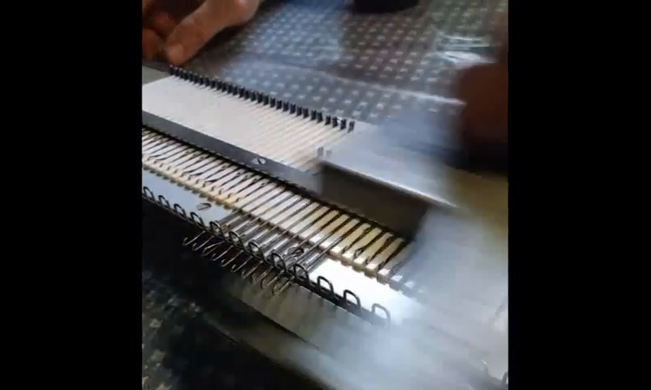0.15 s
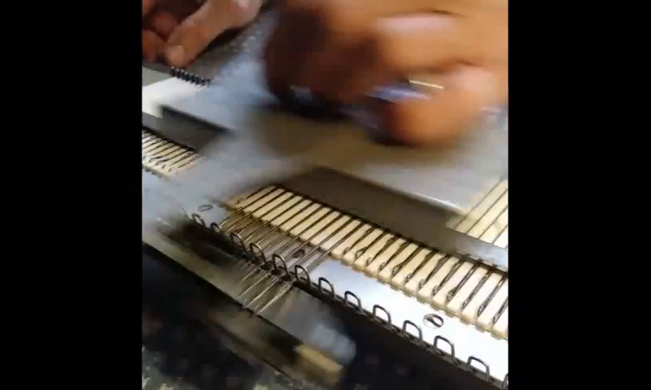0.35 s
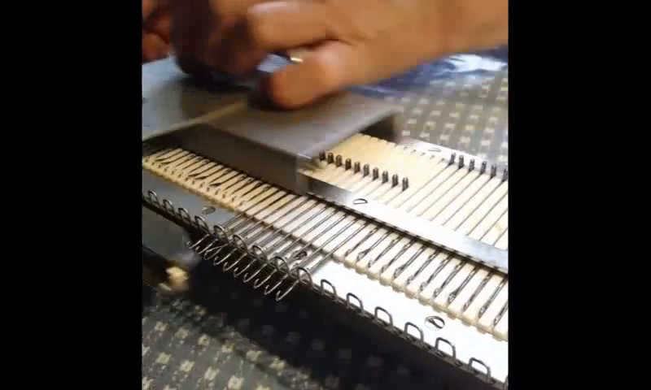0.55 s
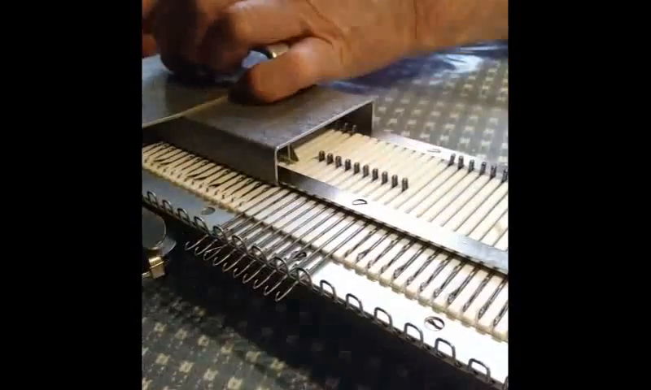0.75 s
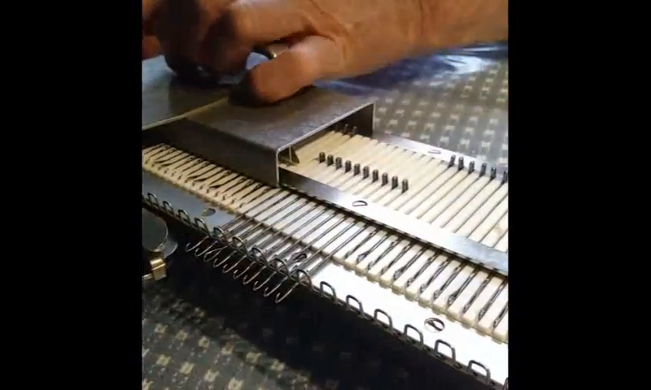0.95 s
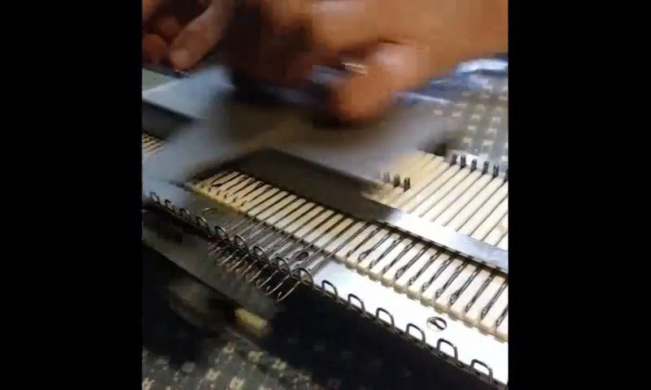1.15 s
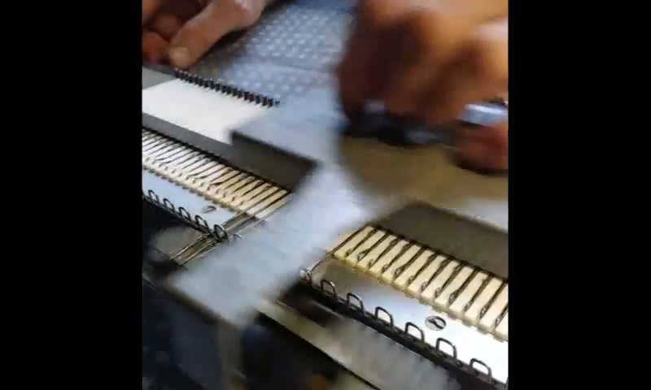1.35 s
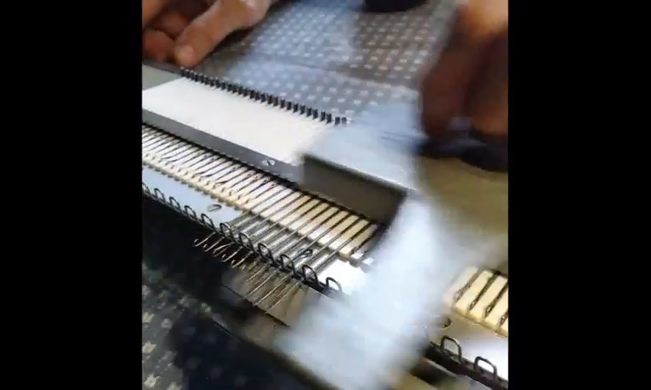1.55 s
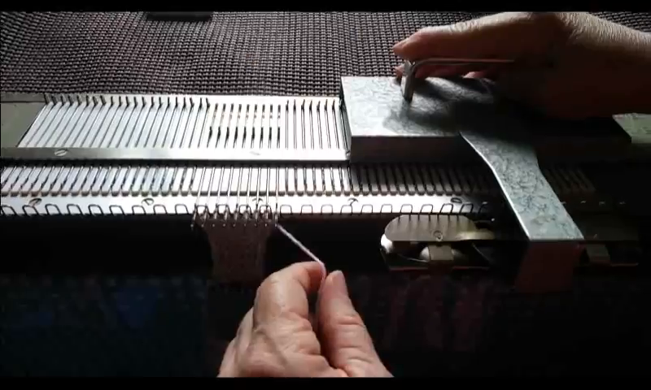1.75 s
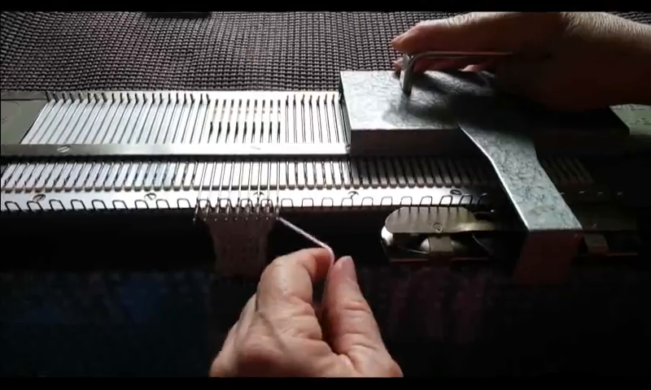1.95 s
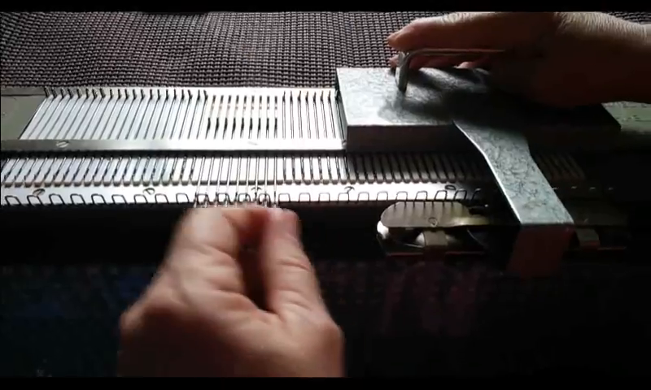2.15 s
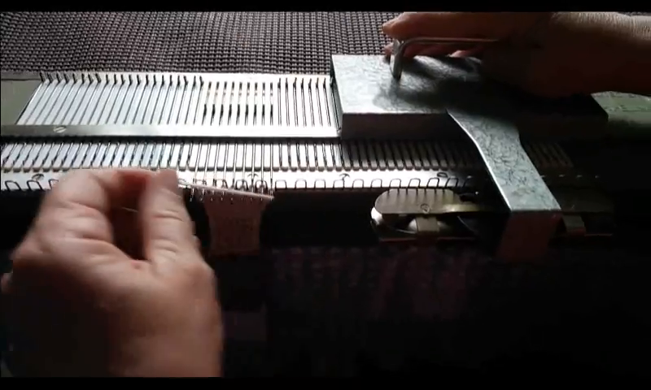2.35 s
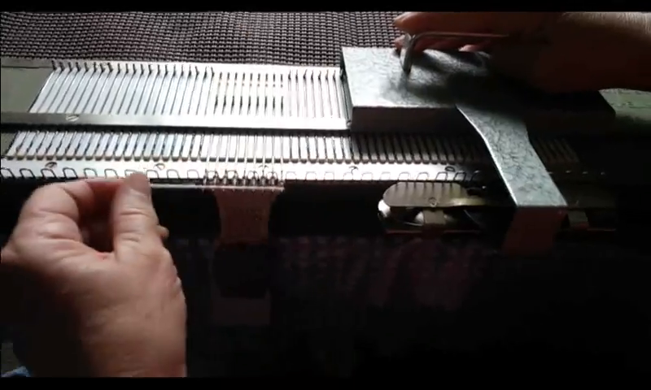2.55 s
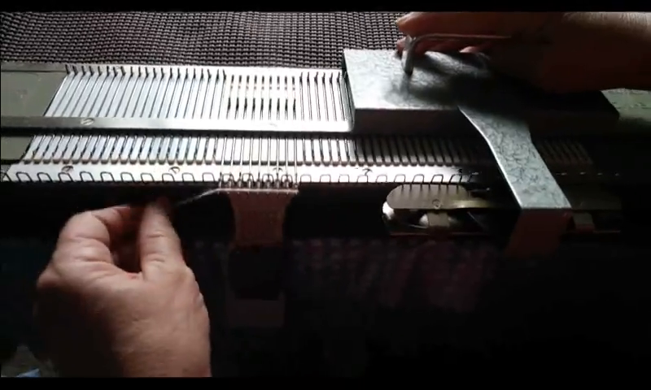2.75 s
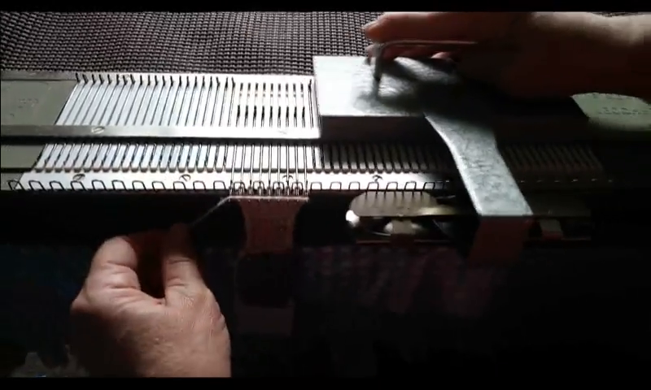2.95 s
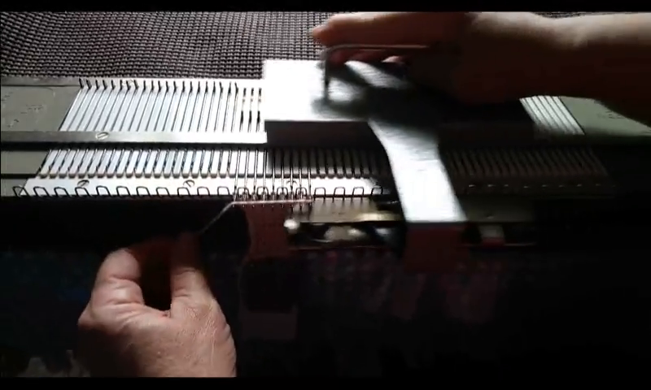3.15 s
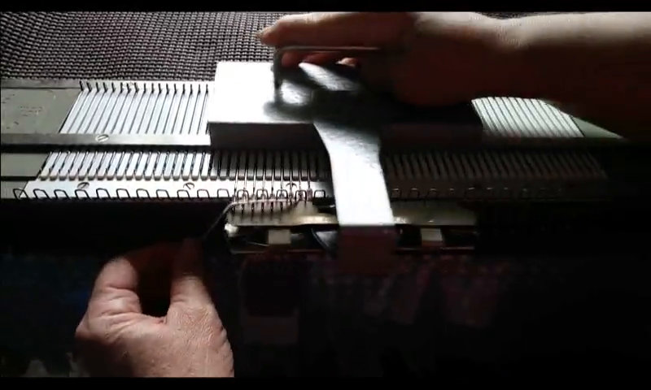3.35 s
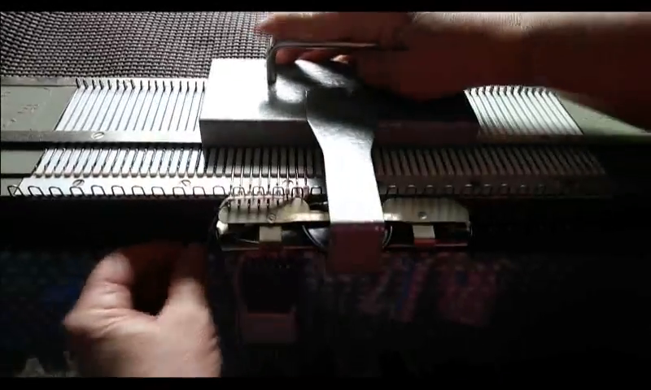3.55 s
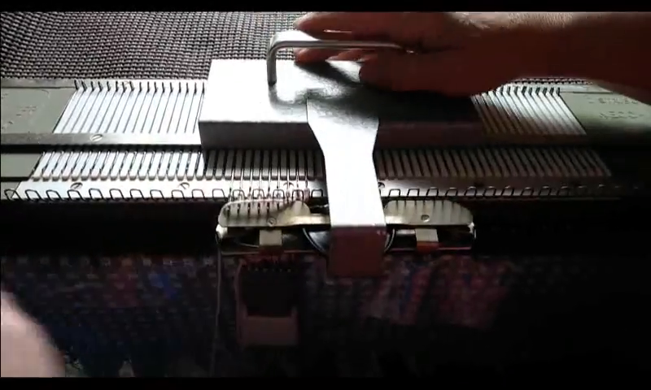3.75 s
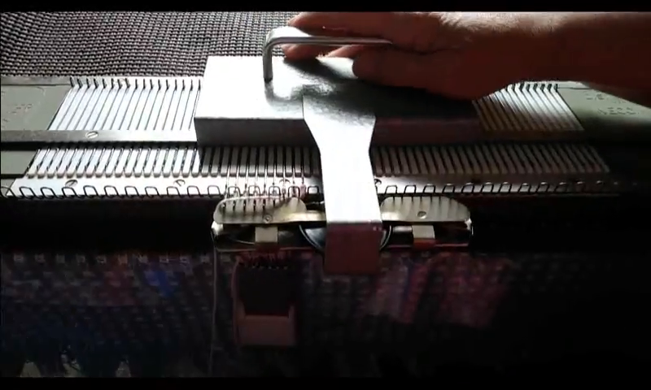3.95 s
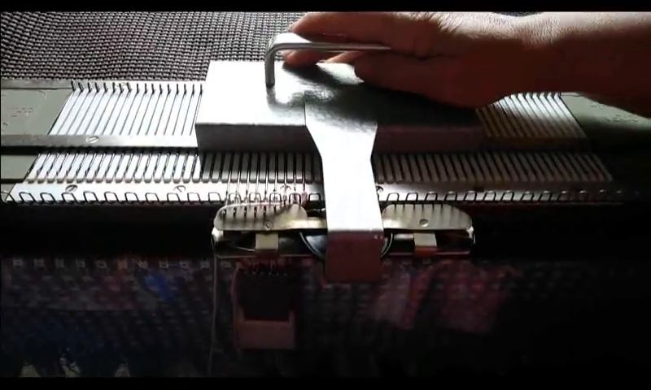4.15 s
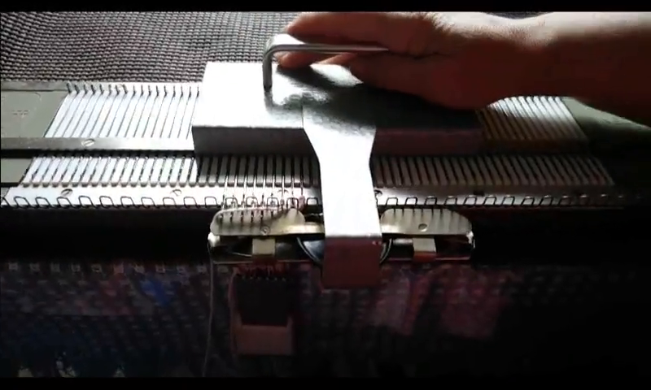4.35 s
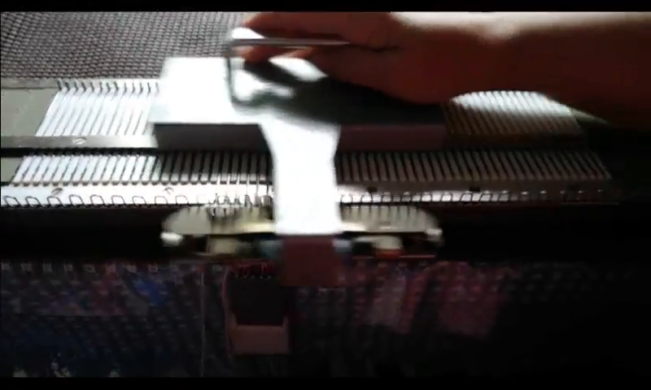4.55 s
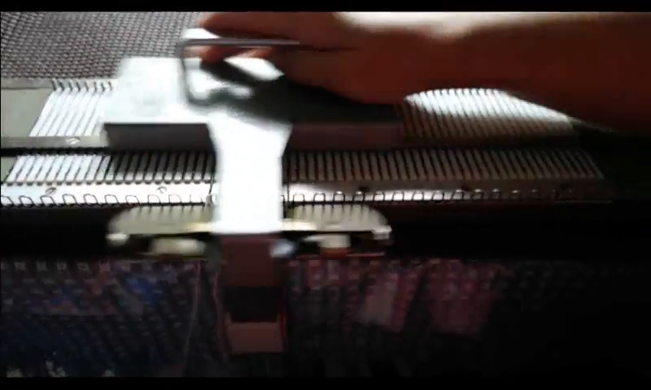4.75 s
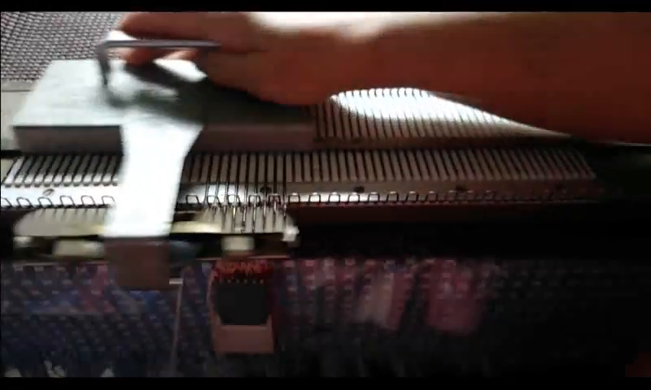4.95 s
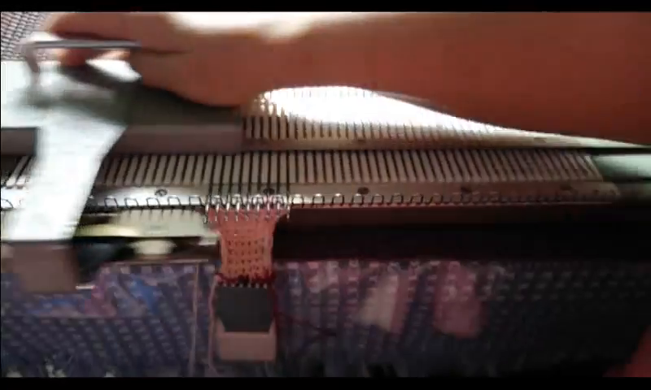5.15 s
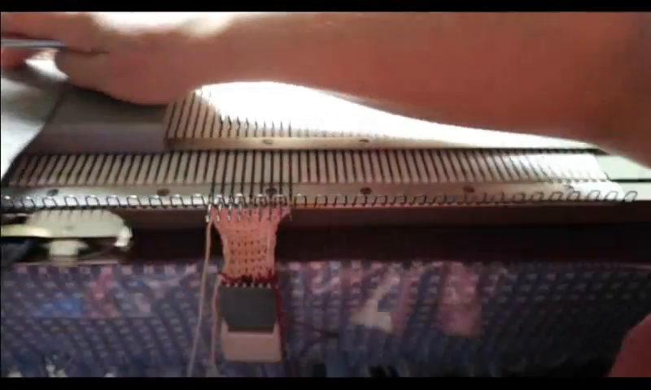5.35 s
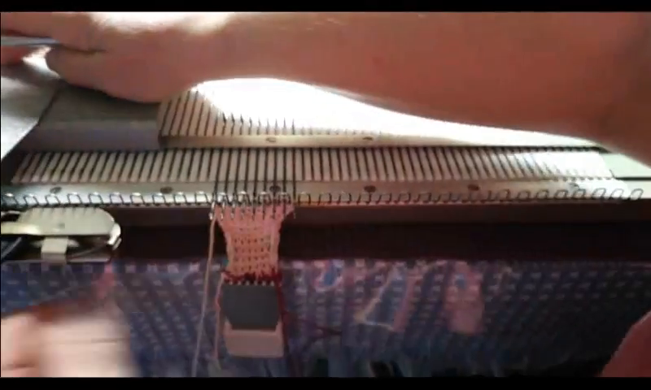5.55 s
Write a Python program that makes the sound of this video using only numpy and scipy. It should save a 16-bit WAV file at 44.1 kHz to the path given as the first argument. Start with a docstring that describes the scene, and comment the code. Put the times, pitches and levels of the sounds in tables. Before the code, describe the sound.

Metal scrapes and needles clatter as a knitting machine carriage slides twice quickly, then slowly, then firmly, in a small room.

```python
"""A bright steel scrape and a rattle of clacks: a knitting machine carriage is pushed by hand along its
needle bed in a small room. Two quick strokes sound close by; after a blink of silence come a slow stroke
and a firm one from the front. Needle butts clack against the cams, the carriage scrapes on its rails and
the bed rumbles. Sliding yarn and metal add thin whistles, and light taps and one dull knock ring the
table, all over a faint room tone."""
import sys
import numpy as np
from scipy import signal
from scipy.fft import rfft, irfft, next_fast_len
from scipy.io import wavfile
from scipy.ndimage import uniform_filter1d

SR = 44100
rng = np.random.default_rng(int(sys.argv[2]) if len(sys.argv) > 2 else 0)


def master_out(mix):
    """Clip the mix to full scale and print it as 16-bit PCM to the path in sys.argv[1]."""
    frames = np.transpose(np.atleast_2d(mix))
    ceiling = np.clip(frames, -1, 1)
    pcm = np.round(ceiling * 32767).astype(np.int16)
    wavfile.write(sys.argv[1], SR, pcm)


N = 246959
TIME = np.arange(N) / SR
FFT_SIZE = next_fast_len(N + SR, real=True) // 2 * 2
FREQ = np.maximum(np.arange(FFT_SIZE // 2 + 1) * SR / FFT_SIZE, 1)

# The swell of the room's low murmur. Each row: time in seconds, relative level in dB.
MURMUR_SWELL = [(1.85, -89), (2.13, -86), (2.6, -74), (4.14, -77), (4.35, -65), (5.1, -73), (5.6, -88)]
# Tone curves of the murmur and the hiss. Each row: frequency in Hz, relative level in dB.
MURMUR_COLOUR = [(18, -50.5), (30, -15), (54, -0.5), (118, -4.5), (150, -2.5), (262, -33), (300, -30),
                 (390, -56.5), (660, -120)]
HISS_COLOUR = [(120, -39.5), (200, -9), (311, -4.5), (334, -16.5), (401, -9), (683, -10.5), (12400, -18),
               (16000, -30.5)]
# The hand's gesture in each stroke; the push bites where the cams meet the needles.
# Each row: time in seconds, push in dB (it drives the scrape), relative bed rumble in dB.
FIRST_PUSH = [(0, -24, -34), (0.058, -38, -47.5), (0.07, -19.5, -36.5), (0.125, -17.5, -37.5),
              (0.32, -15, -36.5), (0.43, -27.5, -36.5), (0.58, -48.5, -48), (0.64, -78.5, -57.5),
              (0.8, -80.5, -77)]
SECOND_PUSH = [(0.9, -71, -79), (0.94, -47.5, -54), (0.975, -35.5, -40), (1.064, -33, -40.5),
               (1.076, -26, -40.5), (1.23, -17.5, -32.5), (1.43, -30, -42.5), (1.51, -17.5, -35),
               (1.62, -39, -46), (1.636, -26.5, -39), (1.73, -33.5, -42.5), (1.78, -49, -53.5)]
SLOW_PUSH = [(2.76, -64.5, -76.5), (2.815, -61.5, -87), (2.835, -45.5, -61), (3.04, -45.5, -69),
             (3.055, -37.5, -83), (3.18, -36.5, -91), (3.26, -31, -61.5), (3.42, -54, -68),
             (3.5, -74, -72.5)]
FIRM_PUSH = [(4.38, -63, -73), (4.422, -56, -63), (4.434, -35, -48), (4.52, -27.5, -44.5),
             (4.61, -42.5, -50.5), (4.7, -33.5, -41), (4.745, -23, -49), (5.05, -33.5, -46.5),
             (5.15, -32.5, -50), (5.32, -40.5, -65), (5.44, -57, -65), (5.6, -84, -78)]
# Tone curve of the metal in each stroke. Each row: frequency in Hz, relative level in dB.
FIRST_METAL = [(290, -44), (500, -14), (586, -21), (750, -11.5), (1360, -9), (2070, -17.5), (2390, -9.5),
               (3390, -10), (5240, -3), (7420, -12.5), (7980, -13), (8450, -14), (11300, -26.5),
               (15100, -23.5), (16000, -24)]
SECOND_METAL = [(290, -51), (500, -10), (659, -19.5), (740, -8.5), (1300, -7.5), (1440, -12.5), (1840, -14),
                (1980, -14.5), (3490, -12.5), (5310, -3.5), (7420, -13), (8090, -14.5), (10700, -25.5),
                (15100, -24.5), (16000, -15)]
SLOW_METAL = [(290, -59), (500, -66), (621, -28), (718, -14), (1510, -2), (1790, 0), (3250, -3),
              (3920, 1.5), (4340, -5.5), (5470, 0.5), (6330, -6), (9360, -9.5), (12000, -30.5),
              (14000, -12.5), (16000, -21.5)]
FIRM_METAL = [(290, -51.5), (500, -15), (843, -9), (974, -4.5), (1140, -5), (1570, -3), (1690, -3),
              (2010, -0.5), (3060, -2.5), (3490, 0), (3920, -3), (4940, -0.5), (11500, -23), (14500, -14),
              (16000, -18)]
# Tone curves of the bed and table. Each row: frequency in Hz, relative level in dB.
BED_CLOSE = [(18, -49.5), (30, -22), (91, -1), (134, -4), (302, -2), (356, -6.5), (481, -1), (560, -13),
             (800, -2.5), (1040, -34), (1760, -120)]
BED_FRONT = [(18, -32), (30, -22.5), (70, 12), (129, 1), (163, -2), (278, -13.5), (386, 0.5), (616, -14.5),
             (800, -2.5), (1040, -40), (1760, -120)]
# The ring of the carriage's steel. Each row: pitch in Hz, width in Hz, level against the tone curve in dB.
STEEL_CLOSE = [(1397, 90, -11.5), (1830, 53, -1.5), (3060, 130, 0.5), (3730, 40, -7), (4650, 97, -2.5),
               (5160, 350, -3), (5540, 74, -5), (5590, 120, 0.5), (6800, 260, -4), (7880, 240, 1.5)]
STEEL_FRONT = [(979, 170, -6), (1586, 24, -2.5), (1886, 52, -15.5), (2822, 34, -3), (3640, 210, -16),
               (4510, 15, -8), (4940, 100, -6), (5810, 79, -10), (6895, 120, -8), (7940, 100, -1)]
# Rattles as the cams cross evenly spaced needles.
# Each row: start and end in seconds, needles per second, strength above the push in dB.
NEEDLE_RUNS = [(0.069, 0.083, 90, 10), (0.109, 0.179, 100, 15.5), (0.191, 0.291, 92, 13),
               (0.303, 0.415, 71, 11), (1.069, 1.251, 72, 15.5), (1.477, 1.511, 62, 10),
               (1.633, 1.724, 66, 9), (2.796, 2.824, 33, 17.5), (3.208, 3.307, 31, 13.5),
               (4.463, 4.488, 41, 19), (4.511, 4.561, 41, 14.5), (4.764, 5.046, 43, 14)]
# A stiff needle snags and snaps free. Each row: time in seconds, strength in dB.
SNAGS = [(0.194, -2), (0.934, -24.5), (1.071, -7), (1.225, -8), (1.32, -6.5), (1.369, -9.5), (1.399, -12),
         (1.589, -15.5), (2.934, -30), (3.049, -33), (3.126, -23.5), (4.436, -18.5), (4.726, -4),
         (4.768, -4.5), (4.914, -15.5), (4.943, -20)]
# Lone resonances of sliding yarn and metal, from hollow scrapes to thin whistles.
# Each row: start and end in seconds, pitch in Hz, width in Hz, level in dB.
WHISTLES = [(0.207, 0.329, 1330, 280, -27), (0.36, 0.684, 5300, 200, -51), (0.5, 0.829, 500, 34, -53),
            (0.491, 0.809, 1750, 63, -55.5), (0.935, 1.119, 1000, 360, -37), (1.052, 1.31, 1480, 290, -27),
            (2.099, 2.56, 2210, 125, -58), (2.11, 2.383, 4250, 90, -77.5), (2.275, 2.46, 5850, 150, -77),
            (2.395, 2.5, 1340, 130, -75.5), (2.41, 2.66, 146, 18, -61.5), (2.468, 2.837, 2290, 86, -66.5),
            (2.72, 3.095, 3520, 140, -50), (3.353, 3.48, 490, 29, -56), (3.458, 3.618, 3670, 100, -60.5),
            (3.66, 3.914, 3650, 74, -68.5), (4.061, 4.155, 1185, 360, -57), (4.054, 4.17, 1753, 69, -62)]
# The carriage creeps and its rail sings.
# Each row: start and end in seconds, level in dB, brightness in dB per octave.
CREEPS = [(3.403, 3.602, -62.5, -6.5), (4.223, 4.658, -55.5, 0), (5.265, 5.694, -62, 4)]
# The rail's resonances, lowest first. Each row: pitch in Hz, width in Hz, relative level in dB.
RAIL_MODES = [(2200, 180, 1), (3165, 100, -9.5), (3710, 41, -19), (4470, 270, 0.5), (5100, 90, -18.5),
              (5630, 610, -3), (6820, 98, -10.5)]
# Low thuds and thin pings. Each row: start in seconds, level in dB, pitch in Hz, 60 dB decay in seconds.
THUDS = [(0.365, -20.5, 244, 0.069), (0.821, -46.5, 883, 0.036), (0.821, -56, 2530, 0.051),
         (1.098, -21, 300.7, 0.077), (2.83, -55.5, 231, 0.29), (4.999, -13, 2550, 0.015),
         (5.024, -15, 2590, 0.016), (5.048, -9, 2240, 0.0096)]
# Knocks and taps on machine and table. Each row: start in seconds, level in dB, low and high edge in Hz.
KNOCKS = [(0.822, -44, 48.4, 587), (0.933, -37, 197.2, 1492), (2.932, -47.5, 185, 1570),
          (3.511, -37, 1500, 4000), (3.673, -23, 111, 5620), (4.389, -40, 1470, 2300),
          (4.64, -25, 2440, 3300), (4.66, -38, 2130, 3400)]
# Tone curve of a knock. Each row: frequency in Hz, relative level in dB.
KNOCK_COLOUR = [(47, -26), (80, -2.5), (157, -3), (296, -10), (431, -7.5), (464, -16), (529, -11.5),
                (770, -18), (894, -14), (1930, -13), (3250, -28.5), (5090, -25.5), (7000, -44),
                (9100, -105), (15400, -120)]
# The ring of table and frame. Each row: pitch in Hz, level against the knock in dB, 60 dB decay in seconds.
TABLE_MODES = [(160, -17.5, 0.46), (298, -25, 0.028), (956, -15, 0.081), (1850, -19.5, 0.066)]


def from_db(db):
    """Decibels to gain."""
    return 10 ** (np.asarray(db) / 20)


def rms_one(x):
    """Scale to rms 1."""
    return x / np.sqrt(np.mean(np.abs(x) ** 2) + 1e-20)


def band(x, low_hz, high_hz, order=4):
    """Butterworth band-pass."""
    edges = [low_hz, min(high_hz, SR / 2 - 100)]
    return signal.sosfilt(signal.butter(order, edges, "band", fs=SR, output="sos"), x + 1e-18)


def body(colour, modes=()):
    """A resonant body of unit power: a broad tone curve with ringing peaks standing on it."""
    hz, db = np.transpose(colour)
    curve = from_db(np.interp(np.log(FREQ), np.log(hz), db))
    cepstrum = irfft(np.log(curve))
    broad = np.exp(2 * rfft(cepstrum[:FFT_SIZE // 2], FFT_SIZE))   # minimum phase: nothing sounds early
    peaks = sum(from_db(level) / (1 + 2j * (FREQ - pitch) / width) for pitch, width, level in modes)
    return rms_one(broad * (1 + peaks))


def through(x, response):
    """Play x through a frequency response."""
    return irfft(rfft(x, FFT_SIZE) * response)[:N]


def dying(start, t60):
    """Envelope that jumps to 1 and dies away."""
    return (TIME >= start) * from_db(-60 * np.clip((TIME - start) / t60, 0, 2))


def add(out, start, sound):
    """Mix a short sound into out at start seconds."""
    at = round(start * SR)
    out[at:at + len(sound)] += sound[:len(out) - at]


def room_tone():
    """A faint low murmur swells and sinks under a steady hiss."""
    swell_db = np.interp(TIME, *np.transpose(MURMUR_SWELL))
    murmur = from_db(swell_db + 3.5) * through(rng.standard_normal(N), body(MURMUR_COLOUR))
    hiss = from_db(-78.5) * through(rng.standard_normal(N), body(HISS_COLOUR))
    return murmur + hiss


def friction(catches_per_s, spread_db, catch_s, smooth):
    """The grit of sliding contact: tiny catches, each a short burst, over a smooth hiss."""
    catching = rng.random(N) < catches_per_s / SR
    catches = catching * from_db(spread_db * np.clip(rng.standard_normal(N), -2, 2))
    power = signal.lfilter([1], [1, -np.exp(-1 / (catch_s * SR))], catches ** 2 + 1e-18)
    return rms_one(rng.standard_normal(N) * np.sqrt(power / power.mean() + smooth))


def jingle(count, taps_per_s, spread_db, t60):
    """A steely shimmer: jostled needles ring at random moments, each at its own pitch."""
    out, decay = np.zeros(N), from_db(-60 / (t60 * SR))
    for hz in np.geomspace(850, 15000, count) * rng.uniform(.96, 1.04, count):
        taps = np.full(N, 1e-18)
        at = np.flatnonzero(rng.random(N) < taps_per_s / SR)
        taps[at] = from_db(spread_db * np.clip(rng.standard_normal(len(at)), -2, 2))
        angle = 2 * np.pi * hz / SR
        ring = signal.lfilter([0, np.sin(angle)], [1, -2 * decay * np.cos(angle), decay ** 2], taps)
        out += np.sqrt(hz) * ring
    return rms_one(out)


def stroke(push, metal, bed, steel, contact, rail_db, shell_db, shell_follows,
           clack_db, clack_t60, sparkle_db, dull_below_db):
    """One push of the carriage: scrape and clacks ring in the same steel while the bed rumbles below."""
    times, push_points, bed_points = np.transpose(push)
    fade_in = np.clip((TIME - times[0]) / 0.026, 0, 1)
    fade_out = np.clip((times[-1] + 0.022 - TIME) / 0.022, 0, 1)
    moving = fade_in * fade_out
    push_db, firm_db = np.interp(TIME, times, push_points), -25
    rail_gain = moving * from_db(push_db)
    shell_gain = moving * from_db(shell_db + shell_follows * (push_db - firm_db))
    bed_gain = moving * from_db(np.interp(TIME, times, bed_points) - 1.5)

    carriage = body(metal, steel)
    scrape = through(contact, carriage)
    bright = rms_one(band(scrape, 2000, SR / 2, order=3))
    treble = through(bright, 1 / (1 + (7000 / FREQ) ** 16))
    # the scrape's treble fades as it gets quiet
    quietness = 1 / (1 + (rail_gain / from_db(dull_below_db)) ** 2)
    rail = from_db(rail_db) * rail_gain * (bright - np.maximum(quietness, .2) * treble)
    shell = shell_gain * rms_one(band(scrape, 700, 2000, order=3))   # the carriage's hollow midrange

    sparkle = from_db(sparkle_db / (1 + (7500 / FREQ) ** 4))   # treble shelf: harder or softer clacks
    blows = clacks(needle_blows(push), clack_t60)
    rattle = from_db(clack_db) * through(blows, carriage * sparkle)
    judder = friction(catches_per_s=240, spread_db=4.5, catch_s=0.017, smooth=1.0)
    rumble = bed_gain * through(judder, body(bed))
    return rail + shell + rattle + rumble


def room(x, wet_db, t60):
    """Dense reflections of a small furnished room."""
    tail = band(rng.standard_normal(N) * dying(0.0062, t60), 100, 11000, order=1)
    return x + from_db(wet_db) * through(x, rms_one(rfft(tail, FFT_SIZE)))


def needle_blows(push, uneven_db=2.13):
    """The rhythm of one stroke: needles come evenly and hit harder with the push; a few snag."""
    times, push_db, _ = np.transpose(push)
    blows = list(SNAGS)
    for first, last, per_s, above_db in NEEDLE_RUNS:
        starts = np.linspace(first, last, 1 + round((last - first) * per_s))
        levels = np.interp(starts, times, push_db) + above_db
        blows += zip(starts, levels + uneven_db * rng.standard_normal(len(starts)))
    return [(start, db) for start, db in blows if times[0] <= start <= times[-1]]


def clacks(blows, t60, rise_s=.0004, rebound_db=-6, rebound_s=.003, ring_db=-16.5, ring_t60=0.026):
    """Each needle butt strikes the cam, rebounds in its slot and rings at a few pitches of its own."""
    out, t = np.zeros(N), np.arange(SR // 10) / SR
    attack = 1 - np.exp(-t / rise_s)
    for start, db in blows:
        delay = rebound_s * rng.uniform(0.56, 1.4)
        strike = from_db(-60 * t / t60)
        rebound = (t > delay) * from_db(rebound_db - 60 * np.abs(t - delay) / t60)
        pitches = np.array([[1800], [3000], [4600], [7000], [13000]]) * rng.uniform(0.87, 1.2, (5, 1))
        ring = np.sin(2 * np.pi * pitches * t).sum(axis=0) * from_db(ring_db - 60 * t / ring_t60)
        snap = (strike + rebound) * rng.choice([-1, 1], len(t))
        add(out, start, from_db(db) * attack * (snap + ring))
    return out


def whistles(stutter_db=2.5, stutter_s=.025):
    """Sliding wakes narrow resonances that swell, stutter and fade; a creep sings all the rail's own."""
    out = np.zeros(N)
    singing = [(start, end, hz, width, db + mode_db + tilt * np.log2(hz / RAIL_MODES[0][0]))
               for start, end, db, tilt in CREEPS for hz, width, mode_db in RAIL_MODES]
    for start, end, hz, width, db in WHISTLES + singing:
        length = int(np.clip(end - start, .01, 1) * SR)
        swell = np.abs(np.sin(np.linspace(0, np.pi, length))) ** 1.4
        wobble = np.interp(TIME[:SR] / stutter_s, np.arange(SR), rng.standard_normal(SR))
        resonance = band(rng.standard_normal(SR), hz - width / 2, hz + width / 2, order=2)
        tone = from_db(stutter_db * wobble) * resonance
        add(out, start, from_db(db) * swell * rms_one(tone[-length:]))
    return out


def mode(hz, t60):
    """A struck mode takes about a cycle to build, then dies away."""
    t = TIME[:SR]
    return (from_db(-60 * t / t60) - from_db(-15 * t * hz)) * np.sin(2 * np.pi * hz * t)


def thuds():
    """Single parts catch or settle, each with one low thud or thin ping."""
    out = np.zeros(N)
    for start, db, hz, t60 in THUDS:
        add(out, start, from_db(db) * mode(hz, t60))
    return out


def knocks():
    """A short woody blow, then the table and frame ring on."""
    out, impulse = np.zeros(N), irfft(body(KNOCK_COLOUR))[:SR // 4]
    table = sum(from_db(db) * mode(hz, t60) for hz, db, t60 in TABLE_MODES)
    envelope = (dying(0, t60=0.021) + from_db(-0.5) * dying(0, t60=.31))[:SR]
    for start, db, low_hz, high_hz in KNOCKS:
        blow = signal.fftconvolve(rng.standard_normal(SR) * envelope, impulse)[:SR]
        wood = band(blow, low_hz, high_hz, order=3)
        ring = band(table, low_hz, high_hz, order=3)
        add(out, start, from_db(db) * (wood / np.abs(wood).max() + ring))
    return out


def scene():
    """Two close strokes and two from the front, with the small sounds in and around them."""
    needles = jingle(count=56, taps_per_s=70, spread_db=6.0, t60=0.03)
    coarse_grit = friction(catches_per_s=970, spread_db=5.0, catch_s=0.00041, smooth=0.82)
    even_grit = friction(catches_per_s=630, spread_db=0.0, catch_s=0.00072, smooth=0.96)
    quick = rms_one(coarse_grit + from_db(-3.5) * needles)
    slow = rms_one(even_grit + from_db(-1.5) * needles)
    close = stroke(FIRST_PUSH, FIRST_METAL, BED_CLOSE, STEEL_CLOSE, quick,
                   rail_db=-0.45, shell_db=-35.5, shell_follows=0.84,
                   clack_db=-5.0, clack_t60=0.015, sparkle_db=2.0, dull_below_db=-28)
    close += stroke(SECOND_PUSH, SECOND_METAL, BED_CLOSE, STEEL_CLOSE, quick,
                    rail_db=1.3, shell_db=-35.5, shell_follows=0.84,
                    clack_db=-2.5, clack_t60=0.012, sparkle_db=-5.0, dull_below_db=-31.5)
    front = stroke(SLOW_PUSH, SLOW_METAL, BED_FRONT, STEEL_FRONT, slow,
                   rail_db=0.2, shell_db=-31.5, shell_follows=0.88,
                   clack_db=-3.5, clack_t60=0.03, sparkle_db=-3.5, dull_below_db=-46.0)
    front += stroke(FIRM_PUSH, FIRM_METAL, BED_FRONT, STEEL_FRONT, slow,
                    rail_db=0.06, shell_db=-26.5, shell_follows=1.19,
                    clack_db=-1.5, clack_t60=0.011, sparkle_db=4.0, dull_below_db=-43.5)
    machine = room(close, wet_db=-17.0, t60=0.16) + room(front, wet_db=-18, t60=0.057)
    return (machine + thuds() + knocks() + whistles() + room_tone())[None, :]


def record(dry):
    """A blink of silence after the close strokes; sub-bass and top are trimmed, peaks are rounded."""
    silent_from_s, silent_until_s = 1.781, 1.826
    low_cut_hz, high_cut_hz, ceiling = 32, 15900, .82
    gate = uniform_filter1d(1. * ((TIME < silent_from_s) | (TIME > silent_until_s)), size=64)
    trimmed = signal.sosfilt(signal.butter(2, low_cut_hz, "high", fs=SR, output="sos"), dry)
    rounded = ceiling * np.tanh(trimmed * gate / ceiling)
    return signal.sosfilt(signal.ellip(12, .1, 80, high_cut_hz, fs=SR, output="sos"), rounded)


dry = scene()
out = record(dry)
master_out(out)
```